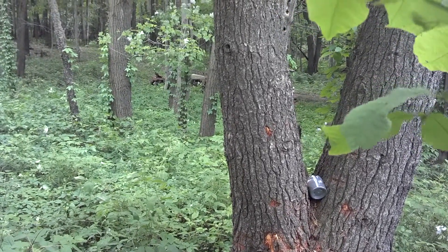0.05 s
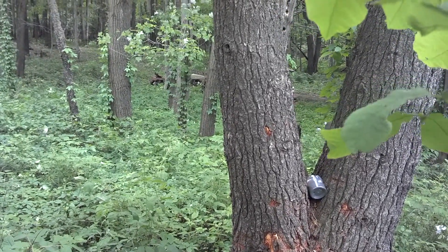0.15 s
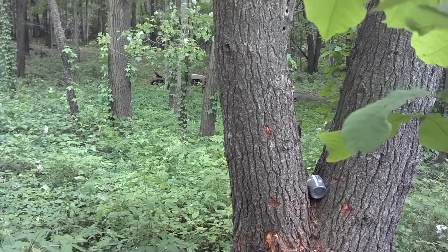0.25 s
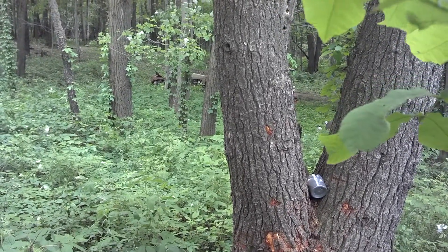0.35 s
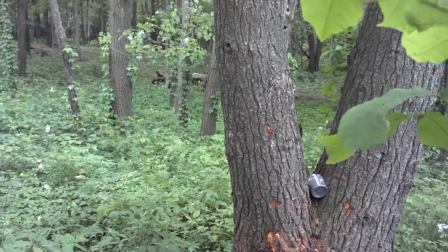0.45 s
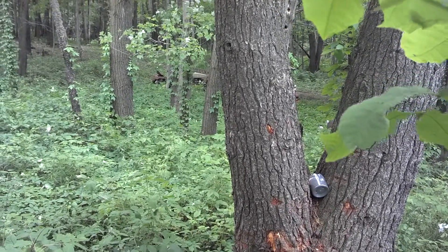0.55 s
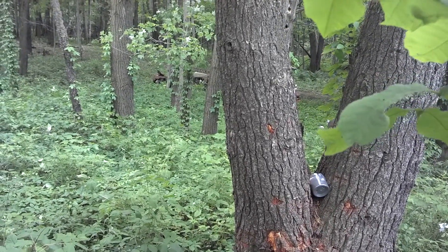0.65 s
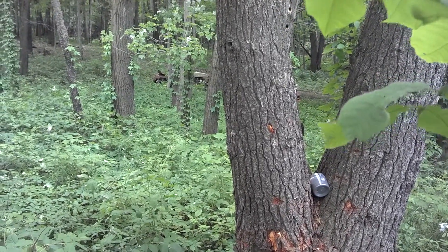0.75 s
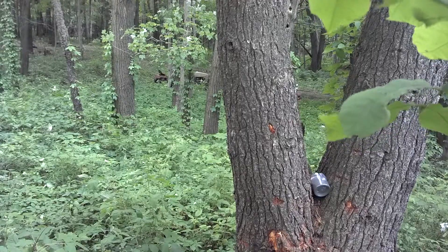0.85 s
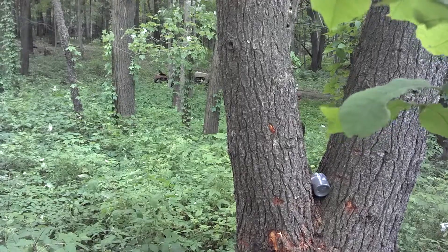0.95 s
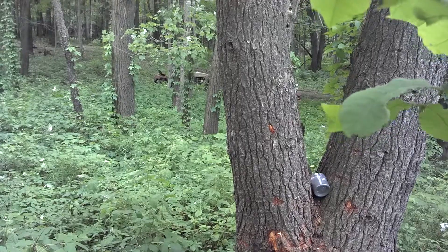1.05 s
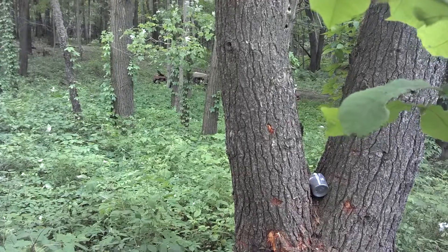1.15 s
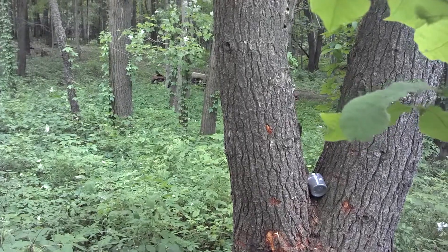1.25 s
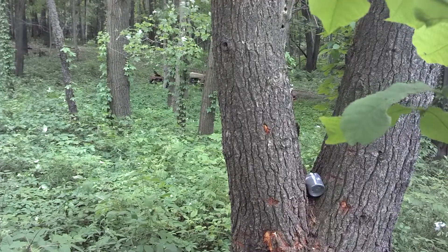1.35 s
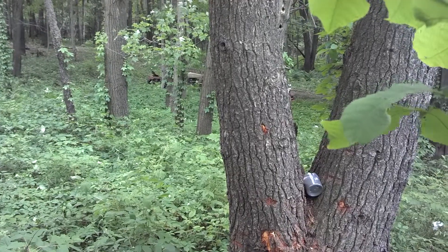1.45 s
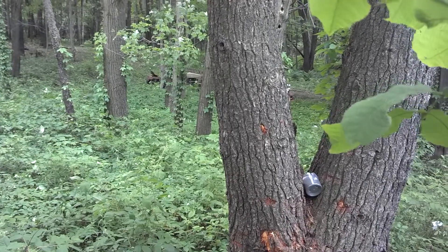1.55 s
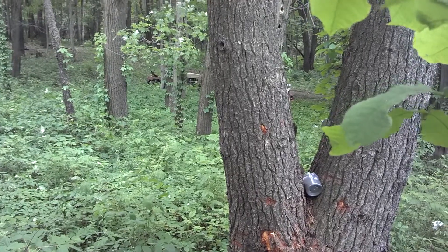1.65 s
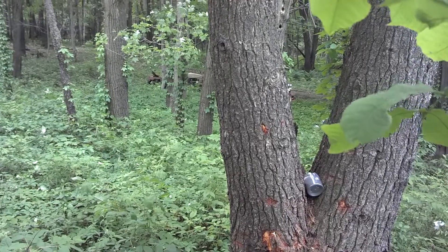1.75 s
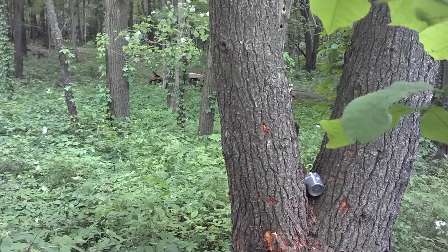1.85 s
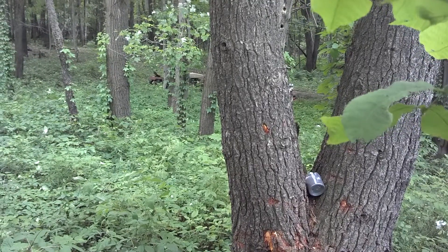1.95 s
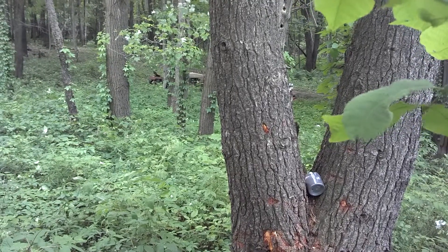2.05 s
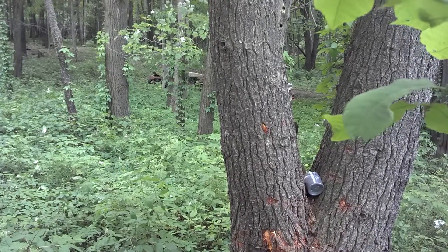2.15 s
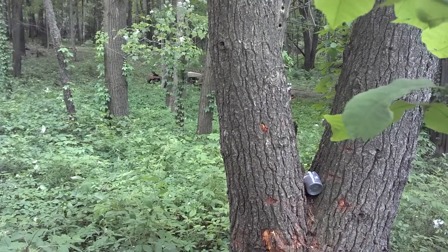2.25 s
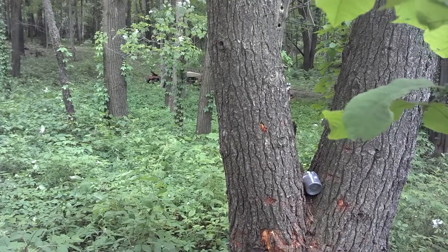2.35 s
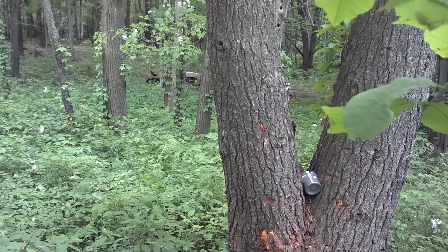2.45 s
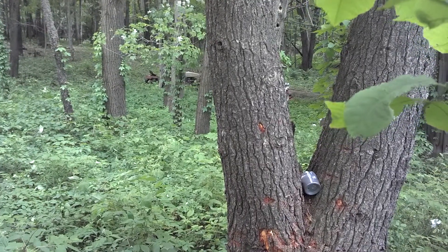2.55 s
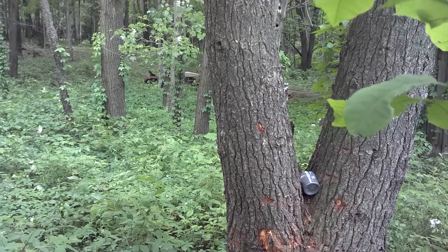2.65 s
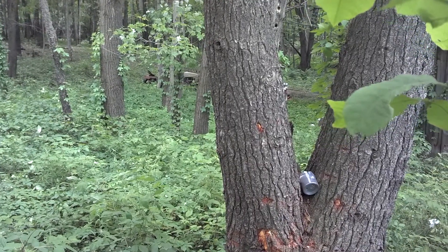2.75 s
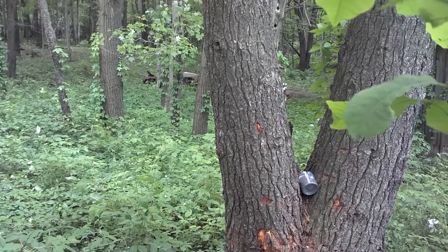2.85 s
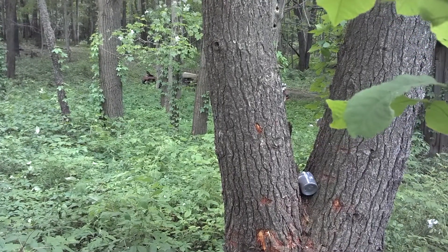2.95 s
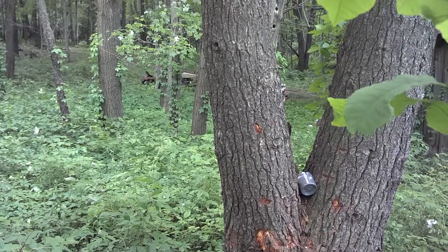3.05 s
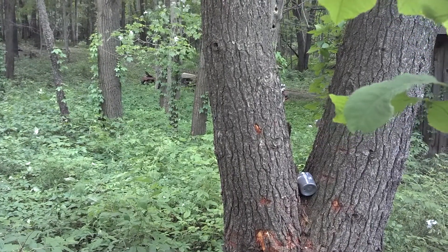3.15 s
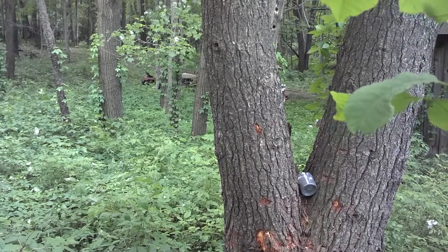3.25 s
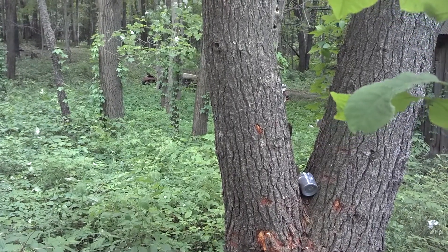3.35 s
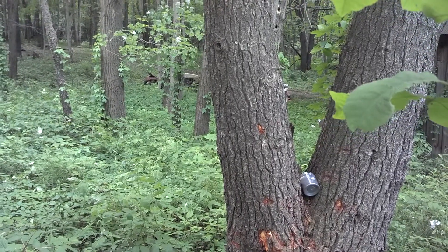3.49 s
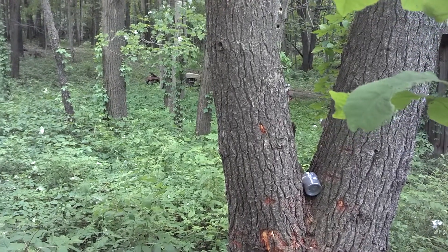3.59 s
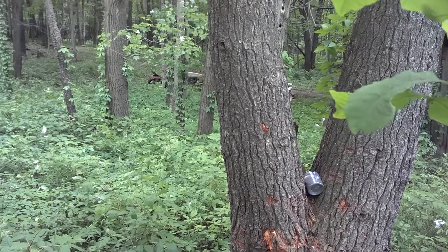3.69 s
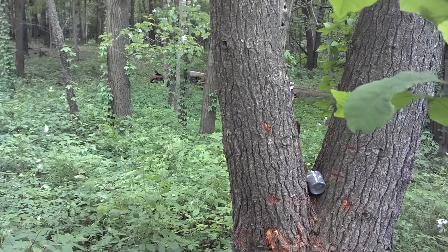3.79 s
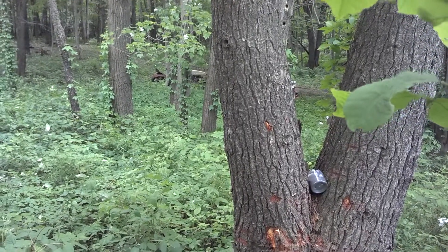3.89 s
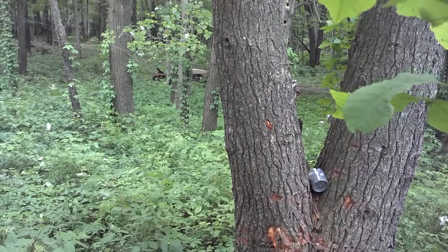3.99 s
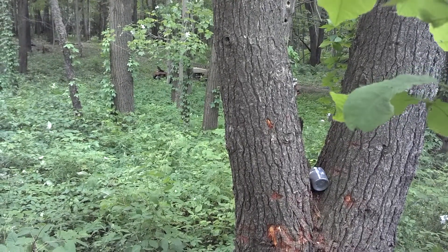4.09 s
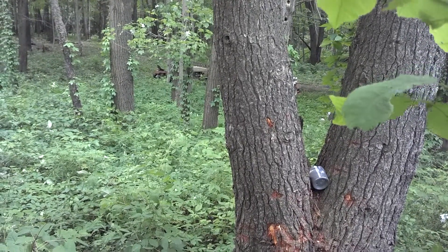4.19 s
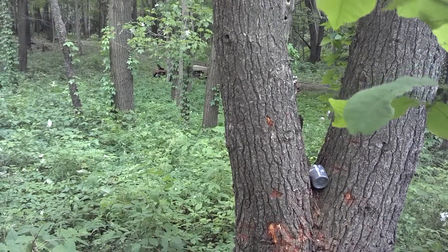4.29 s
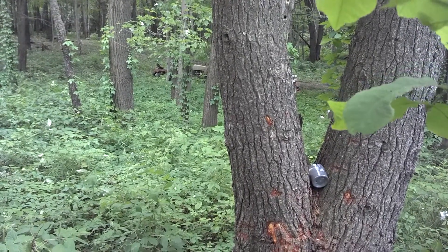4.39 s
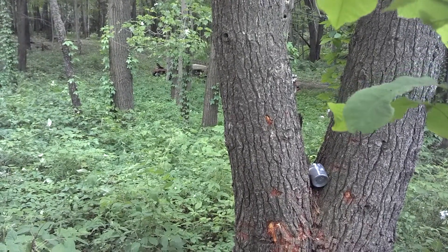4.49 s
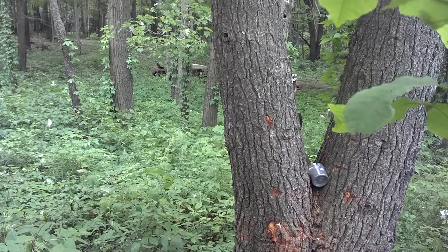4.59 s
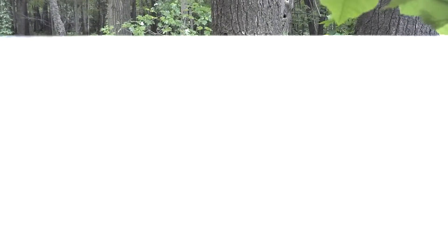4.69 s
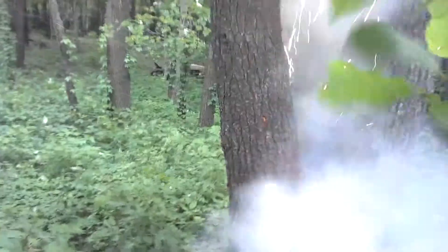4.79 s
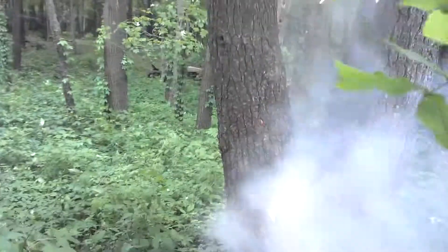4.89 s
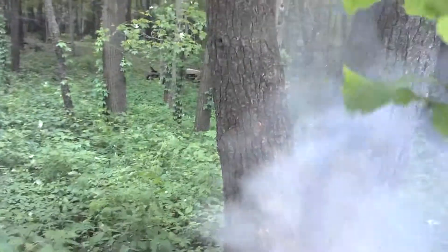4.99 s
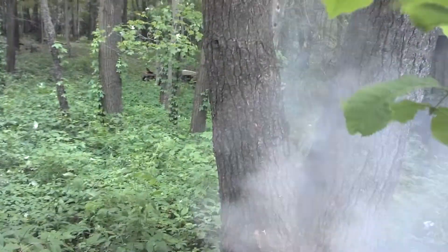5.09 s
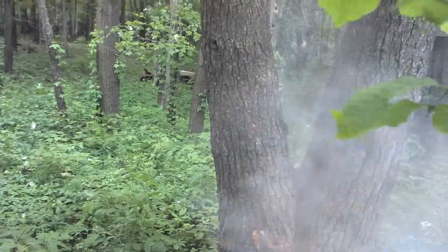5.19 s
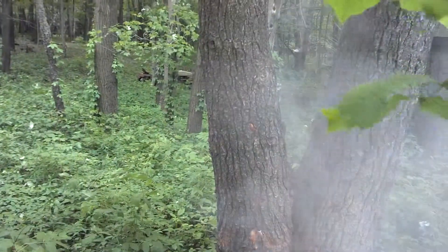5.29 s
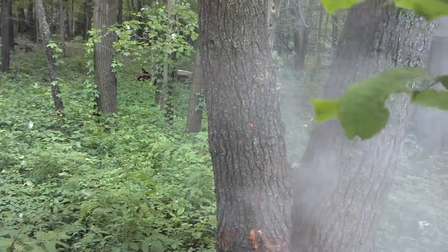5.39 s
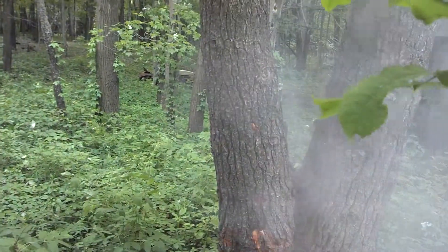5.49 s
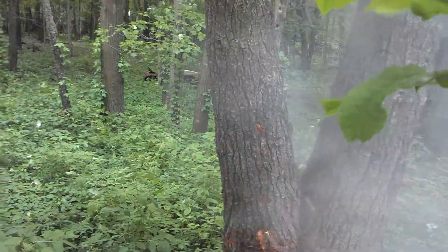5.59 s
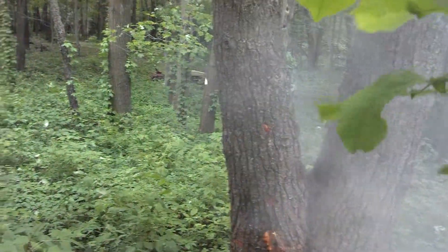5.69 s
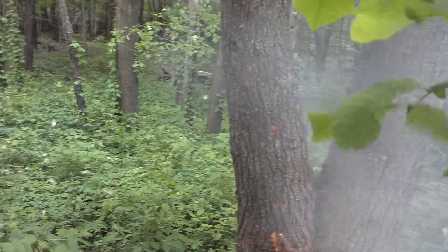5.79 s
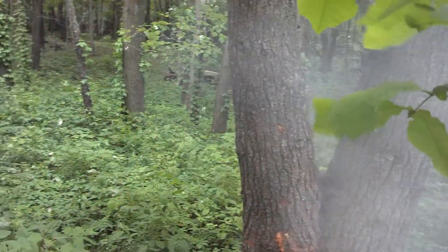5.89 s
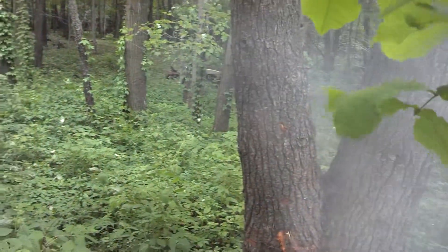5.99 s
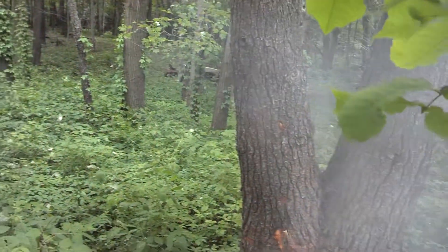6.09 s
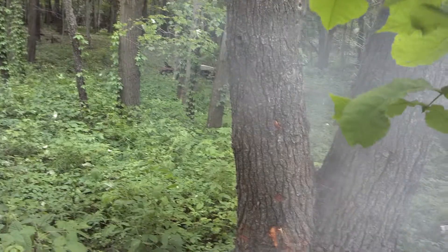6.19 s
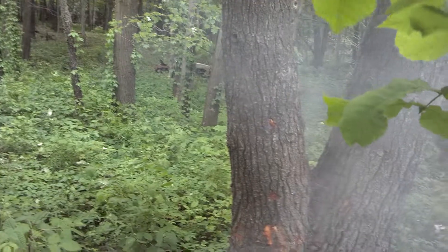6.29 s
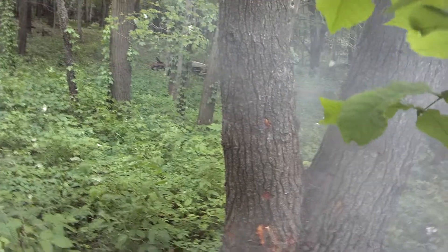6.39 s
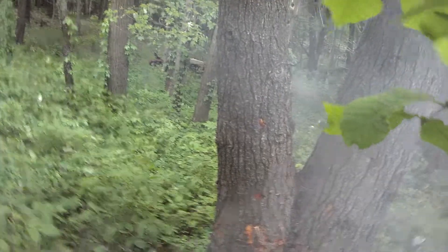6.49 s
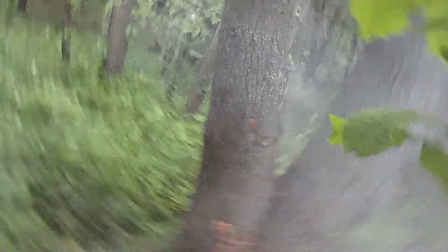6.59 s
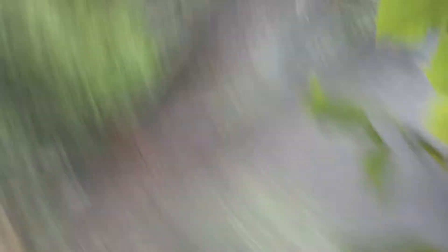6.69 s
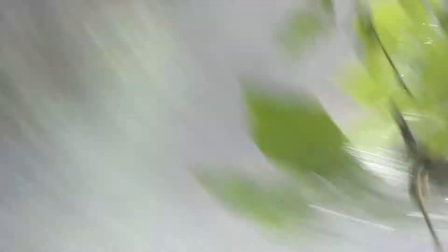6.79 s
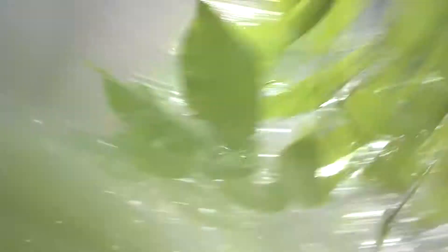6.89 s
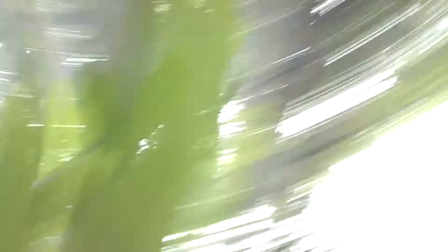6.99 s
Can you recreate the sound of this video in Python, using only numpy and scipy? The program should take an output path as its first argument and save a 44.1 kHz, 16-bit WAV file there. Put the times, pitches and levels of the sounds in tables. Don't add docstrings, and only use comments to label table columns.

```python
import sys
import numpy as np
from scipy import signal
from scipy.io import wavfile
from scipy.ndimage import uniform_filter1d

SR = 44100
rng = np.random.default_rng(int(sys.argv[2]) if len(sys.argv) > 2 else 0)


def natural_amplitude(level_db):
    exponent = np.asarray(level_db, float) / 20
    return 10 ** exponent


def log_audio(samples):
    frames = np.atleast_2d(samples).T
    limited = np.clip(frames, -1, 1)
    pcm = np.round(limited * 32767).astype(np.int16)
    wavfile.write(sys.argv[1], SR, pcm)


N = 310464
HZ, FRAMES = np.fft.rfftfreq(512, 1 / SR), N // 128 + 5
TIME = np.arange(FRAMES) * 128 / SR

# crack_s, blast_s
SHOTS = [
    (3.2578, 3.2815),
    (4.734, 4.7324),
]
# loudest_from_s, held_until_s, bright_db, dark_db, late_roll_db
ANSWERS = [
    (3.25, 3.359, -17.5, -0.14, -29.5),
    (4.861, 5.006, -16.5, 1, -22),
]
# bright_tilt_db_per_octave, bass_loss_share, bullet_shock_over_hiss_db
COLOURS = [
    (-0.47, 1.4, 13.5),
    (-2, 0.24, 9),
]
# pitch_hz, level_db, extra_loss_db_per_s
BRIGHT = [(100, -21.5, -15), (400, -4, -19.5), (1000, 2, -14), (2160, 4, -6.5), (3150, 4, -1.5),
          (4930, 1.5, 8.5), (7550, -3.5, 23), (9700, -5, 34), (14500, -4.5, 85)]
# pitch_hz, level_db, extra_loss_db_per_s
DARK = [(40, -19.5, 18), (90, 4, 16), (130, 9, 6.5), (200, 2, 38), (354, 1, 2.1), (477, 0.1, 0.11),
        (717, -6.5, 0.1), (994, -13.5, 0.1), (1600, -23.5, 3), (3000, -44, 5), (6080, -74.5, 5)]
# under_hold_db, loss_db_per_s
BRIGHT_FALL = [(-0.04, 64.1), (-15.5, 32.2)]
# under_hold_db, loss_db_per_s
DARK_FALL = [(-2.4, 203), (-6, 32.5)]
BRIGHT_SOONER_S, LATE_FALL_DB_S = 0.096, 3.5
BRIGHT_SWELL_DB_S, DARK_SWELL_DB_S = 26.5, 163
MUZZLE_DB, MUZZLE_FALL_DB_S = -6, 124
FRESH_SHARE = 0.84
BASS_AGE_S = 0.59
SHOCK_S = .0015


def scatter(answer, until_s, crack_s, blast_s, tilt_db, bass_loss, shock_db):
    top_s, hold_s, bright_db, dark_db, late_db = answer
    t = np.arange(N) / SR
    age = np.clip(TIME - crack_s, 0, 1.1)
    since = np.maximum(TIME - crack_s, 0)
    wait = np.clip(top_s - TIME, 0, .2)
    after = np.maximum(TIME - hold_s, 0)
    bright_after = np.maximum(TIME - hold_s + BRIGHT_SOONER_S, 0)
    rap_gain = duck_db(TIME, RAP_DUCK)

    hiss = bright_db + fall(bright_after, BRIGHT_FALL) - BRIGHT_SWELL_DB_S * wait
    trunks = dark_db + fall(after, DARK_FALL) - DARK_SWELL_DB_S * wait
    muzzle = MUZZLE_DB - MUZZLE_FALL_DB_S * since
    far = late_db - LATE_FALL_DB_S * since
    boom = 10 * np.log10(natural_amplitude(trunks) ** 2 + natural_amplitude(muzzle) ** 2 + natural_amplitude(far) ** 2)

    tilt = tilt_db * np.log2(HZ[:, None] / 3400 + 0.029)
    stale = np.clip(age - FRESH_SHARE * (top_s - crack_s), 0, 1.1)
    bright = read(BRIGHT) + tilt - read(BRIGHT, column=2) * stale + hiss + rap_gain
    bass_age = np.minimum(age, BASS_AGE_S)
    dark = read(DARK) - bass_loss * read(DARK, column=2) * bass_age + boom + rap_gain

    alive = t < until_s
    rise = np.clip((t - blast_s) / .004, 0, 1)
    shock = 1 + natural_amplitude(shock_db) * np.exp(-np.maximum(t - crack_s, 0) / SHOCK_S)
    roll = low_cut(field(dark, 2.24, 4000, 0.085), 100.5)
    crack = (t > crack_s) * shock * field(bright, 0.6, 20000, 0.027)
    return alive * (crack + rise * roll)


# start_s, peak_db, length_ms
FRONTS = [
    (3.2815, -7, .6),
    (3.2831, -4, .5),
    (3.2849, -1.5, 1.2),
    (3.2945, -4, .8),
    (3.3025, -10, .8),
    (4.7342, -3, 1.2),
    (4.7378, .5, 1.2),
    (4.741, -4, 1.2),
    (4.7876, -1.5, 1.1),
]


def fronts():
    out = np.zeros((2, N))
    for s, db, ms in FRONTS:
        u = np.arange(1000) / SR / (ms / 1000)
        push_pull = (1 - u) * np.exp(-u) * np.minimum(u / .2, 1)
        add(out, s, natural_amplitude(db) * push_pull, 13.5)
    return out


# start_s, peak_db, pitch_hz,
# right_over_left_db
BUMPS = [(3.258, -13, 75, -10), (3.285, -14, 100, -18), (3.3552, -5, 390, 13), (4.736, -15, 90, 12),
         (4.77, -29.5, 45, 19), (5.0367, 1, 170, 2.5), (5.552, -22, 121, 2.1), (5.848, -20.5, 130, 3),
         (6.71, -39, 100, 16), (6.872, -26, 111, -21), (6.952, -30, 150, -15), (6.971, -24, 220, -36),
         (6.981, -23, 420, -21), (6.994, -20, 142, -28), (7.011, -24, 169, -19), (7.02, -20, 200, -21),
         (7.0315, -14, 340, -32)]
BUMP_CYCLES, BUMP_SAG = 14.5, .3
BUMP_RISE = 1


def bumps():
    out, t = np.zeros((2, N)), np.arange(8000) / SR
    for s, db, hz, lean_db in BUMPS:
        t60 = BUMP_CYCLES / hz
        sag = 1 - BUMP_SAG * np.tanh(2 * t / t60)
        swing = np.sin(2 * np.pi * hz * t * sag)
        add(out, s, swing * np.tanh(hz * t / BUMP_RISE) * natural_amplitude(db - 60 * t / t60), lean_db)
    return out


# start_s, under_rest_db, recovery_db_per_s
RAP_DUCK = [(6.93, 7.5, 27.78)]
RAP_S, RAP_HZ, RAP_DB = 6.9278, 293, -4.5
RAP_SQUARE, RAP_FIRST = 6.5, 0.73
RING_HZ, RING_DB, RING_T60 = 155, -15, 0.046
SHELL_HZ, SHELL_DB, SHELL_T60 = 1250, -23, .012


def rap():
    out, t = np.zeros((2, N)), np.arange(4000) / SR
    turn = RAP_HZ * t
    size = np.where(turn < .5, RAP_FIRST * np.tanh(12 * turn), 1.2 - 0.76 * turn)
    hard = np.tanh(RAP_SQUARE * np.sin(2 * np.pi * turn)) * (turn < 1) * size
    shell = np.sin(2 * np.pi * SHELL_HZ * t) * natural_amplitude(SHELL_DB - 60 * t / SHELL_T60)
    ring = np.sin(2 * np.pi * RING_HZ * t) * natural_amplitude(RING_DB - 60 * t / RING_T60)
    add(out, RAP_S, natural_amplitude(RAP_DB) * hard, 30)
    add(out, RAP_S, shell, 30)
    add(out, RAP_S + 1 / RAP_HZ, ring, 30)
    return out


# start_s, peak_db, right_over_left_db
SNAPS = [(5.97, -54, 6), (6.04, -62, 4), (6.139, -53.5, -2), (6.212, -56, 2), (6.262, -60, -7),
         (6.2786, -47, -2.5), (6.305, -39.5, 4.5), (6.322, -55, -1.1), (6.343, -49, 5), (6.369, -35.5, 24),
         (6.714, -47, 5), (6.82, -58, -2), (6.9268, -45, -6)]
# start_s, peak_db, centre_hz, right_over_left_db
TICKS = [(5.008, -41, 11900, -5), (6.085, -59, 3500, -0.5), (6.272, -51, 9100, 5), (6.3679, -36, 1860, 3.5),
         (6.378, -48, 3440, 3.2), (6.454, -55, 3500, 3), (6.461, -49, 2500, 1), (6.506, -59, 10000, -.6),
         (6.545, -44.5, 12500, 0), (6.578, -53, 11000, 6), (6.698, -44, 3000, 3.6), (6.71, -35.5, 1300, 5),
         (6.755, -55, 11100, -2), (6.764, -48, 4200, -0.7), (6.796, -54, 9200, -3.5),
         (6.87, -42, 1770, 3.5), (6.894, -49, 1800, 2), (6.917, -35, 1700, 4), (6.987, -49, 14020, 0),
         (6.981, -44, 900, -8), (7.009, -54, 2000, 0), (7.03, -44, 1800, -2.5)]
# start_s, peak_db, centre_hz, t60_s, right_over_left_db
KNOCKS = [
    (6.474, -38.5, 1690, 0.11, 22),
    (6.4735, -40, 2600, .28, -5),
    (6.539, -48.5, 3300, 0.37, -1),
    (6.55, -52.5, 8300, 0.31, 3.5),
    (5.672, -47.5, 8700, 0.022, 3.4),
]
# start_s, peak_db, centre_hz, t60_s, width_share, right_over_left_db
SHARD = (5.018, -24, 11000, .014, .6, 8)
SNAP_HZ, SNAP_T60, SNAP_WIDTH = 4800, .01, 1.9
TICK_T60, TICK_WIDTH, NARROWER = 0.022, 0.7, .35
KNOCK_WIDTH = 0.4


def debris():
    out, t = np.zeros((2, N)), np.arange(8000) / SR
    pieces = [(s, db, SNAP_HZ, SNAP_T60, SNAP_WIDTH, lean) for s, db, lean in SNAPS]
    for s, db, hz, lean in TICKS:
        pieces.append((s, db, hz, TICK_T60, TICK_WIDTH * (2000 / hz) ** NARROWER, lean))
    pieces += [(s, db, hz, t60, KNOCK_WIDTH, lean) for s, db, hz, t60, lean in KNOCKS]
    pieces.append(SHARD)
    for s, db, hz, t60, share, lean_db in pieces:
        edges = np.clip([hz / (1 + share), hz * (1 + share)], 200, 20000)
        blow = rng.standard_normal(8000) + 12 * (t == 0)
        resonance = signal.butter(2, edges, "bandpass", fs=SR, output="sos")
        ring = evened(signal.sosfilt(resonance, blow))
        add(out, s, ring * natural_amplitude(db - 60 * t / t60), lean_db)
    return out


# pitch_hz, level_db
LEAF = [(500, -41), (1500, -23.5), (3500, -10.5), (6000, -13), (9000, -9.5), (12000, -11), (16000, -11.5)]
PATTER_FROM_S, PATTER_DB, PATTER_EARLY_DB_S = 5.2, -60, 2.5
PATTER_TOP_S, PATTER_TOP_DB, PATTER_RISE_DB_S = 6.72, -45.5, 13
LEAF_DUCK_SHARE = 0.56


def patter():
    left_s = np.maximum(PATTER_TOP_S - TIME, 0)
    dust = PATTER_DB + 6 - PATTER_EARLY_DB_S * left_s
    thick = np.maximum(PATTER_TOP_DB - PATTER_RISE_DB_S * left_s, dust)
    ducked = thick + LEAF_DUCK_SHARE * duck_db(TIME, RAP_DUCK)
    level = np.where(TIME > PATTER_FROM_S, ducked, -120)
    return field(read(LEAF) + level - 0.5, 4.5, 6500, .03)


# start_s, pitch_hz
BIRD = [
    (2.21, 3200),
    (2.24, 3130),
    (2.269, 2480),
    (2.3, 3520),
    (2.335, 2230),
    (2.385, 3300),
    (2.42, 2214),
    (2.475, 3700),
    (2.57, 3620),
]
BIRD_DB, BIRD_EDGE_S = -52, .015
BIRD_HELD_DB, BIRD_FADE_DB = -7, -13


def bird():
    s, hz = np.transpose(BIRD)
    t = np.arange(N) / SR
    flutter = .65 + .35 * np.sin(2 * np.pi * 38 * t)
    edge = np.clip(np.minimum(t - s[0], s[-1] - t) / BIRD_EDGE_S, 0, 1)
    edge *= natural_amplitude(np.interp(t, s[-3:], [0, BIRD_HELD_DB, BIRD_FADE_DB]))
    glide = uniform_filter1d(np.interp(t, s, hz), size=300)
    song = flutter * edge * natural_amplitude(BIRD_DB) * np.sin(2 * np.pi * np.cumsum(glide) / SR)
    smear = rng.standard_normal((2, 6000)) * natural_amplitude(-60 * np.arange(6000) / SR / 0.4)
    smear *= .6 / np.linalg.norm(smear[0])
    return 0.97 * song + signal.oaconvolve(song[None], smear, axes=1)[:, :N]


# pitch_hz, level_db
AIR = [(25, -4), (60, 11.5), (120, 9), (250, 3), (350, 6), (500, 0.9), (1000, -5.5), (1400, -9),
       (3400, -10), (4800, -12.5), (7600, -23), (10300, -25.5), (14500, -31.5)]
# start_s, under_rest_db, recovery_db_per_s
DUCKS = [
    (3.258, 23.5, 4),
    (4.735, 16.5, 11),
]
AIR_DB, BREEZE_DB, BREEZE_UNTIL_S = -40, 1.7, 0.97


def air():
    patches = rng.standard_normal((len(HZ), FRAMES))
    patches = uniform_filter1d(patches, size=8, axis=0)
    patches = evened(uniform_filter1d(patches, size=30, axis=1))
    t = np.arange(N) / SR
    breeze = BREEZE_DB * np.clip((BREEZE_UNTIL_S - t) / 0.16 + .5, 0, 1)
    gain = natural_amplitude(AIR_DB + breeze + duck_db(t, DUCKS) + duck_db(t, RAP_DUCK))
    return gain * low_cut(field(read(AIR) + .7 * patches, .1, SR, 0.1), 82)


# pitch_hz, correlation
SAME = [(60, .9), (130, 1), (350, 0.76), (500, 0.81), (700, 0.28), (1000, 0.3), (1400, -0.067),
        (2000, -0.347), (3400, 0.17)]
# pitch_hz, left_over_right_db
LEAN = [(150, -4), (600, 2), (1500, -2), (5000, 2.5), (8500, 19), (12000, 12)]


def field(db, lumpy_db, per_s, lead_ms):
    size = natural_amplitude(lumpy_db * np.minimum(rng.exponential(1, N), 3)) * (rng.random(N) < per_s / SR)
    arrivals = [evened(size * v) for v in rng.standard_normal((2, N))]
    a, b = signal.stft(arrivals, nperseg=512, noverlap=384)[2]
    same = read(SAME)
    early = np.exp(2j * np.pi * HZ[:, None] * lead_ms / 1000)
    lean = natural_amplitude(read(LEAN) / 2)
    right = same * a * early + np.sqrt(1 - same ** 2) * b
    z = np.array([a * lean, right / lean])
    return signal.istft(z * natural_amplitude(db[:, :z.shape[2]]), nperseg=512, noverlap=384)[1][:, :N]


def add(mix, s, sound, lean_db):
    for port, side in enumerate((-1, 1)):
        start = round(s * SR - side * np.clip(lean_db, -6, 6))
        part = mix[port, start:][:len(sound)]
        part += sound[:len(part)] * natural_amplitude(min(side * lean_db, 0))


def duck_db(t, rows):
    out = 0 * t
    for s, db, per_s in rows:
        out = np.where(t > s, np.minimum(per_s * (t - s) - db, 0), out)
    return out


def fall(after, stages):
    return 10 * np.log10(sum(natural_amplitude(db - per_s * after) ** 2 for db, per_s in stages))


def read(table, column=1):
    rows = np.transpose(table)
    return np.interp(np.log(HZ + 1), np.log(rows[0] + 1), rows[column])[:, None]


def evened(x):
    return x / np.sqrt(np.mean(x ** 2) + 1e-20)


def low_cut(x, hz):
    return signal.sosfilt(signal.butter(3, hz, "highpass", fs=SR, output="sos"), x)


def scene():
    ends = [SHOTS[1][0], N / SR]
    bangs = np.zeros((2, N))
    for answer, end, shot, colour in zip(ANSWERS, ends, SHOTS, COLOURS):
        bangs += scatter(answer, end, *shot, *colour)
    return bangs + fronts() + bumps() + rap() + debris() + patter() + bird() + air()


def roll_off(x):
    return signal.sosfilt(signal.butter(12, 16310, fs=SR, output="sos"), x)


def record(dry):
    ports = 1.2 * np.tanh(dry / 1.2)
    late = np.pad(ports[::-1], ((0, 0), (16, 0)))[:, :N]
    fuzz = natural_amplitude(-85) * rng.standard_normal(dry.shape)
    wide = low_cut(ports - late + fuzz, 25)
    wide = signal.oaconvolve(wide, signal.firwin(301, 15750, fs=SR)[None], "same")
    return roll_off(np.clip(wide, -1, 1))


dry = scene()
out = record(dry)
log_audio(out)
```